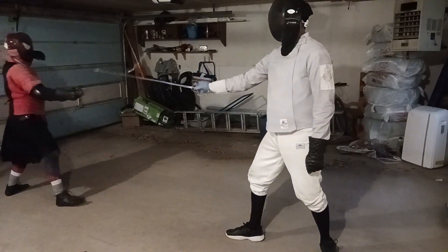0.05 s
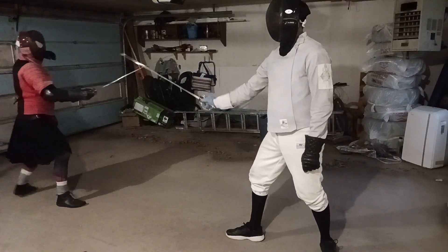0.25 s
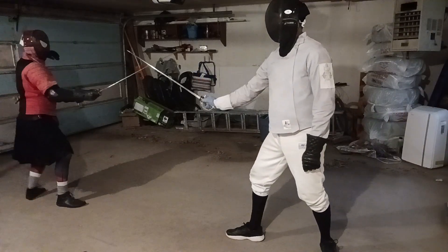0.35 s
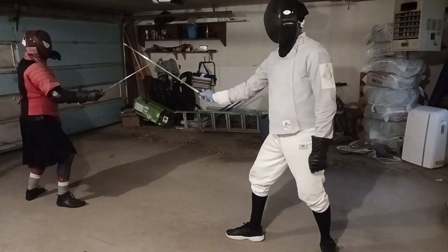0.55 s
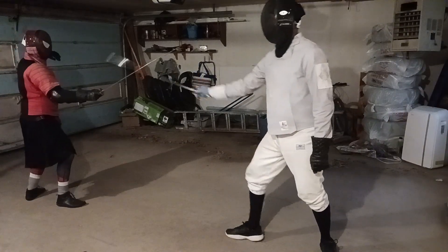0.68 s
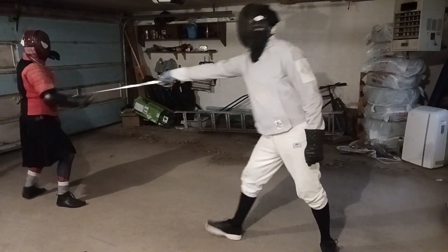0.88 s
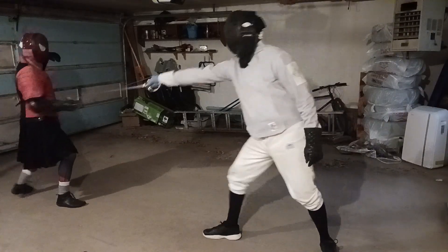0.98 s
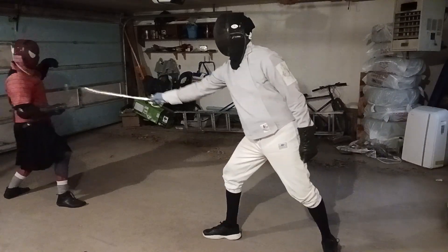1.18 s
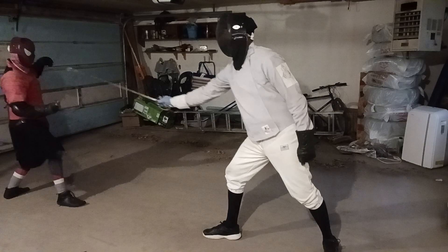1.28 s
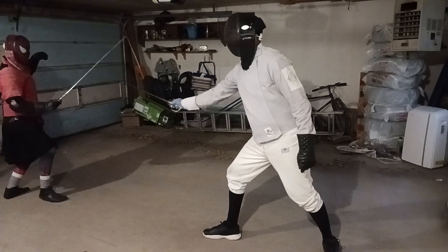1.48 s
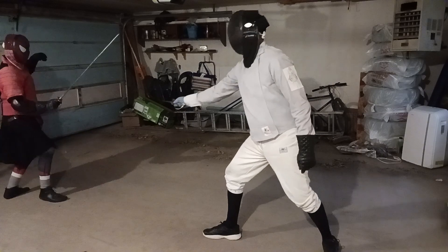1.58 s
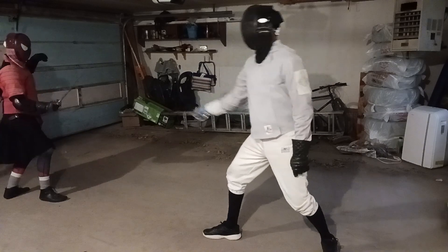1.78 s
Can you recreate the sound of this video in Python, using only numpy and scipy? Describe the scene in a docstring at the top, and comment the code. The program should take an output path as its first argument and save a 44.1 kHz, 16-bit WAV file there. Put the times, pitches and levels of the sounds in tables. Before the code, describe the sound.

Thin steel fencing blades clash sharply and ring, then meet again, grind together with a few knocks and a brief squeal, and flick apart. Shoes slap and scuff the concrete, echoing in a garage over a faint low rumble.

```python
"""Fencing in a garage

Two fencers spar. Their thin steel blades clash sharply and ring, then meet again, grind along each
other with a few knocks and a squeal, and slip apart at the tip. Shoes slap and scuff the concrete
and padded jackets flap. The bare walls echo, over a low rumble."""
import sys
import numpy as np
from scipy import signal
from scipy.fft import rfft, irfft
from scipy.io import wavfile
from scipy.ndimage import uniform_filter1d

SR = 44100
rng = np.random.default_rng(int(sys.argv[2]) if len(sys.argv) > 2 else 0)


def store_wav(level_fs):
    """Save 16-bit WAV to argv[1]."""
    pcm = np.round(np.clip(np.atleast_2d(level_fs), -1, 1) * 32767)
    wavfile.write(sys.argv[1], SR, pcm.T.astype(np.int16))


N = 81585

# Blade striking blade: time_s, level_db, ring_offset_db, sizzle_offset_db, clash_fade_s
# (a fade_s is always the time a sound takes to drop by 60 dB)
BLADE_HITS = [(0.2343, -6.5, 0.5, 0.5, 0.18), (.2378, -11, -11, -9, 0.21), (.2715, -15.5, -9, -7, 0.29),
              (0.7498, -40, -3, -24, .1), (.778, -33.5, 4.5, -15, 0.21), (.8655, -41, 0, -7.5, 0.116),
              (1.065, -27, 7, -4, 0.11), (1.1845, -23, -14, -12, 0.11), (1.223, -19, 2.5, -38, 0.12),
              (1.2808, -22, -8.5, -21, 0.077), (1.2822, -13, -24, -20, 0.034)]
# The strongest tones of the blades: pitch_hz, relative_db, fade_s
BLADE_TONES = [(960, -12.5, 0.3), (1712, -7.5, 0.39), (3225, -3, 0.41), (3410, 3, 0.22), (3473, -3, .32),
               (3600, -7, 0.18), (3936, -1, 0.27), (4016, -0.5, 0.37), (4847, -10, 0.29), (5060, -12, 0.26),
               (5450, -12, 0.28), (6410, -10, 0.27), (6920, -17, 0.38), (7230, -8, .3), (7677, -20, .27),
               (8430, -9, 0.3), (9486, -12, 0.25), (10700, -19, .3), (12700, -13, .18), (15000, -15.5, .15)]
# Steel rubbing on steel, from bass to treble: pitch_hz, relative_db
GRIND_SPECTRUM = [(100, -41), (700, -24), (1150, -6), (1650, -7.5), (2400, -10), (3400, -0.5), (3950, 4),
                  (4700, -4), (7000, -1.5), (10000, -3), (11800, -16), (14000, -14.5), (16000, -20.5)]
SLIPS_PER_S, SLIP_SPREAD_DB = 6000, 2.5  # tiny slips of one edge along the other


def amp(db):
    """Turns decibels into a number to multiply by."""
    return 10 ** (np.asarray(db) / 20)


def unit(x):
    """Scales a signal to an average strength (rms) of 1."""
    return x / np.sqrt(np.mean(x ** 2) + 1e-20)


def look_up(table, hz):
    """Reads between the rows of a table, with octaves evenly spaced."""
    pitches, values = np.transpose(table)
    return np.interp(np.log(hz + 1), np.log(pitches + 1), values)


def add(mix, start_s, sound):
    """Mixes a sound in at the given time."""
    part = mix[max(round(start_s * SR), 0):][:len(sound)]
    part += sound[:len(part)]


def colour(x, spectrum, tilt_db=0):
    """Shapes a signal's bass and treble, at strength 1; tilt_db per octave brightens it."""
    hz = np.fft.rfftfreq(len(x), 1 / SR)
    gain = amp(look_up(spectrum, hz) + tilt_db * np.log2(hz + 1))
    return unit(irfft(rfft(x) * gain, len(x)))


def fade(t, fade_s):
    """Drops by 60 dB every fade_s."""
    return np.exp(-np.log(1000) * t / fade_s)


def swell(t, rise_s, fall_s):
    """Grows for rise_s, then drops by 20 dB every fall_s."""
    return np.minimum(t / rise_s, 1) * 10 ** (-np.maximum(t - rise_s, 0) / fall_s)


def clicks(size, per_s, spread_db):
    """Tiny random clicks of uneven strength."""
    spikes = rng.choice([-1, 1], size) * (rng.random(size) < per_s / SR)
    return spikes * amp(spread_db * np.minimum(rng.exponential(1, size), 4))


def struck_steel(tones):
    """Struck steel sounds several dying tones at once, starting at a total strength of 1."""
    t = np.arange(SR // 2) / SR
    out = sum(amp(db) * fade(t, fade_s) * np.sin(2 * np.pi * (hz * t + rng.random()))
              for hz, db, fade_s in tones)
    return out / np.sqrt(sum(amp(db) ** 2 / 2 for _, db, _ in tones))


def rubbed_steel(friction, tones):
    """Rubbing keeps the steel's tones ringing, as strongly as the rubbing itself."""
    ring = signal.fftconvolve(friction, struck_steel(tones))[:len(friction)]
    return unit(ring) * friction.std()


def rumble():
    """A steady low noise lies under everything."""
    # The background noise: pitch_hz, relative_db
    spectrum = [(10, -11.5), (27, -0.5), (40, -7.5), (60, -16), (95, -29.5), (128, -22), (170, -34.5),
                (500, -34), (2000, -43), (4000, -44), (8000, -60), (16000, -70)]
    return amp(-38.5) * colour(rng.standard_normal(N), spectrum)


def shoes():
    """Soles drag grit across the concrete and slap down on it."""
    # Shoes dragging: start_s, rise_s, fall_s, level_db, tilt_db_per_octave
    scuffs = [(0, 0.0039, 0.11, -45.5, 0.94), (.165, 0.013, 0.036, -48.5, 9),
              (.33, 0.072, 0.18, -34.5, -1.5), (.445, 0.038, .13, -34.5, 3), (.53, 0.037, 0.042, -39, 4),
              (.95, 0.039, 0.172, -38, -1.5), (1.06, 0.023, 0.12, -28, 1.2), (1.235, .06, 0.096, -33, -0.8),
              (1.505, 0.033, 0.071, -25.5, 0.1), (1.54, 0.037, 0.1, -29, -1.6)]
    # Grit under a shoe: pitch_hz, relative_db
    grit_spectrum = [(60, -31), (200, -15), (500, -9), (1000, -4.5), (2300, 0), (3400, 2), (4500, -3),
                     (6500, -10), (10000, -17.5), (12000, -29), (16000, -42)]
    # Shoes landing: start_s, level_db, tilt_db_per_octave
    steps = [(.032, -41.5, 1.5), (.405, -35.5, 2.5), (.452, -25, -0.2), (.962, -45.5, 4), (1.068, -28, 3.5),
             (1.16, -36.5, -3), (1.226, -36.5, 8.5)]
    # The slap of a sole: pitch_hz, relative_db
    sole_spectrum = [(40, -28), (150, -21), (290, -6.5), (370, 0), (470, 0.5), (620, -.5), (850, -8.5),
                     (1300, -14.5), (3000, -29), (12000, -58.5)]
    out, t = np.zeros(N), np.arange(SR // 2) / SR
    for start_s, rise_s, fall_s, db, tilt_db in scuffs:
        grit = colour(clicks(len(t), per_s=5000, spread_db=3), grit_spectrum, tilt_db)
        add(out, start_s, amp(db) * grit * swell(t, rise_s, fall_s))
    for start_s, db, tilt_db in steps:
        slap = colour(rng.standard_normal(len(t)), sole_spectrum, tilt_db)
        add(out, start_s, amp(db) * slap * swell(t, rise_s=0.0041, fall_s=0.033))
    return out


def garage(x, echo_db):
    """Bare walls add a dense wash of echoes whose treble dies first."""
    # How long the echoes last: pitch_hz, fade_s
    echo_fades = [(100, 0.41), (400, 0.57), (1400, 0.565), (3700, 0.54), (8000, 0.4), (14000, 0.22)]
    echoes_per_s, wall_delay_s = 4000, 0.006
    echoes = rng.standard_normal(SR) * (rng.random(SR) < echoes_per_s / SR)
    hz, t, bands = signal.stft(echoes, SR, nperseg=256)
    bands *= fade(t, look_up(echo_fades, hz)[:, None])
    tail = signal.istft(bands, SR, nperseg=256)[1]
    out = x.copy()
    add(out, wall_delay_s, amp(echo_db) * signal.fftconvolve(x, tail / np.linalg.norm(tail)))
    return out


def blade_clashes():
    """Each hit shakes many tones at once: a snap, a short clash and a sizzle on top."""
    # The crowd of weaker tones of the bending steel: pitch_hz, relative_db
    clash_spectrum = [(100, -35), (200, -20.5), (350, -27.5), (700, -13.5), (950, -8.5), (1700, -8.5),
                      (2400, -11.5), (2950, -6), (3400, 3.5), (4400, -4.5), (6200, -6.5), (9800, -4.5),
                      (11500, -13), (16000, -29)]
    # The very high hiss of a hit: pitch_hz, relative_db
    sizzle_spectrum = [(100, -63), (8000, -34), (12200, -6), (13100, 1.5), (14600, 2.5), (16000, -10)]
    out, t = np.zeros(N), np.arange(SR // 2) / SR
    for start_s, db, _, sizzle_db, clash_fade_s in BLADE_HITS:
        snap = amp(1.5) * fade(t, fade_s=0.017)
        clash = colour(rng.standard_normal(len(t)), clash_spectrum) * (snap + fade(t, clash_fade_s)) / 2
        sizzle = colour(rng.standard_normal(len(t)), sizzle_spectrum) * fade(t, fade_s=0.033)
        add(out, start_s, amp(db) * (clash + amp(sizzle_db - 1.5) * sizzle))
    return out


def blade_ringing():
    """The blades' strongest tones sing on after each hit."""
    out = np.zeros(N)
    for start_s, db, ring_db, _, _ in BLADE_HITS:
        add(out, start_s, amp(db + ring_db - 10.5) * struck_steel(BLADE_TONES))
    return out


def jackets():
    """Heavy cloth gives a dull flap as the fencers strike and lunge."""
    # Arm and body movements: start_s, rise_s, fall_s, level_db
    moves = [(.24, 0.029, 0.18, -43), (.95, 0.13, 0.26, -43), (1.13, 0.067, 0.25, -46)]
    # Padded cloth flapping: pitch_hz, relative_db
    cloth_spectrum = [(60, -25.5), (140, -16), (200, 0.5), (300, -4), (500, -7.5), (1500, -18),
                      (12000, -62)]
    out, t = np.zeros(N), np.arange(SR // 2) / SR
    for start_s, rise_s, fall_s, db in moves:
        cloth = colour(rng.standard_normal(len(t)), cloth_spectrum)
        add(out, start_s, amp(db) * cloth * swell(t, rise_s, fall_s))
    return out


def blade_slide():
    """The edges catch and slip in a shuddering stream of clicks that keeps the steel ringing."""
    # How hard the blades rub: time_s, level_db
    rubbing = [(.749, -48), (.79, -31), (.815, -31.5), (.855, -41.5), (.88, -31.5), (.915, -36),
               (.965, -30.5), (.984, -47), (1.005, -28), (1.05, -29), (1.09, -24), (1.13, -47),
               (1.175, -61), (1.19, -30), (1.24, -29), (1.265, -43.5), (1.287, -21.5), (1.315, -36),
               (1.36, -32.5), (1.42, -36), (1.495, -34.5), (1.51, -60)]
    # High tones that the rubbing sets off: pitch_hz, width_hz, relative_db
    squeals = [(4300, 300, -11), (8570, 380, 4), (9380, 490, 1), (9600, 260, -4), (14300, 1400, -12)]
    shudder_db, thrust_s, thrust_width_s = 1.22, 1.012, 0.029
    t = np.arange(N) / SR
    smooth_noise = uniform_filter1d(rng.standard_normal(N), size=250)
    shudder = unit(uniform_filter1d(smooth_noise, size=150))
    rubbing_db = np.interp(t, *np.transpose(rubbing), left=-120, right=-120)
    force = amp(rubbing_db + shudder_db * shudder)
    slips = moving_contact(clicks(N, SLIPS_PER_S, SLIP_SPREAD_DB))
    grind = force * colour(slips, GRIND_SPECTRUM)
    # The edges squeal when the thrust is fastest; a wider tone dies sooner.
    thrust = np.exp(-((t - thrust_s) / thrust_width_s) ** 2 / 2)
    squeal_tones = [(hz, db, np.log(1000) / np.pi / width_hz) for hz, width_hz, db in squeals]
    squeal = rubbed_steel(force * thrust * slips, squeal_tones)
    return grind + amp(-0.5) * squeal + amp(-15.5) * rubbed_steel(grind, BLADE_TONES)


def moving_contact(x, depth_db=5, drift_s=0.082):
    """As the touching point travels along the steel, some pitches swell and others fade at random."""
    bands = signal.stft(x, nperseg=512)[2]
    carry_over = np.exp(-256 / SR / drift_s)  # the drift takes a step every 256 samples
    drift = unit(signal.lfilter([1], [1, -carry_over], rng.standard_normal(bands.shape)))
    bands *= amp(depth_db * drift)
    return unit(signal.istft(bands, nperseg=512)[1][:len(x)])


def tip_flick():
    """One blade runs off the other with a quick scrape, and its tip zings."""
    # The tones of the tip: pitch_hz, relative_db, fade_s
    tip_tones = [(3472, 4, 0.095), (4600, 2.5, 0.078), (6270, -14, .1), (7080, -5, 0.107), (7687, -6, .1),
                 (8204, -14, 0.13), (9954, 2, 0.089), (10546, -7, 0.102)]
    out, t = np.zeros(N), np.arange(SR // 2) / SR
    slips = clicks(len(t), SLIPS_PER_S, SLIP_SPREAD_DB)
    scrape = colour(slips, GRIND_SPECTRUM, tilt_db=1.7)  # the thin tip scrapes brighter
    scrape *= swell(t, rise_s=0.0078, fall_s=0.021)
    zing = amp(-6.5) * rubbed_steel(scrape, tip_tones)
    add(out, start_s=1.4985, sound=amp(-17) * (scrape + zing))
    return out


def scene():
    """Fencers and blades echo in the garage; the rumble and the ring after each hit get no echo."""
    mix = rumble() + garage(shoes() + jackets(), echo_db=-2)
    mix += garage(blade_clashes() + blade_slide() + tip_flick(), echo_db=-5.5)
    mix += blade_ringing()
    return mix[None]


def record(dry):
    """The microphone overloads and rounds off the loudest peaks; then the highest treble is cut."""
    ceiling, cutoff_hz = 1.2, 15850
    rounded = ceiling * np.tanh(dry / ceiling)
    lowpass = signal.firwin(511, cutoff_hz, window=("kaiser", 9), fs=SR)
    return signal.oaconvolve(rounded, lowpass[None], "same")


dry = scene()
out = record(dry)
store_wav(out)
```